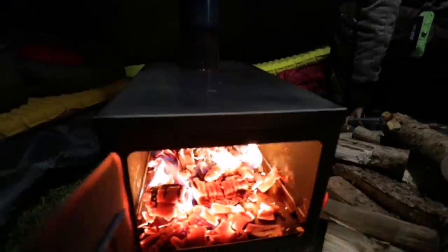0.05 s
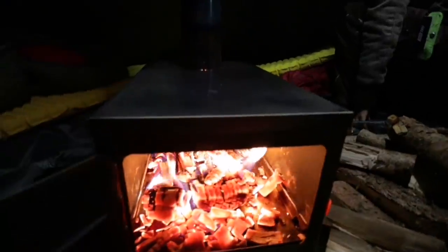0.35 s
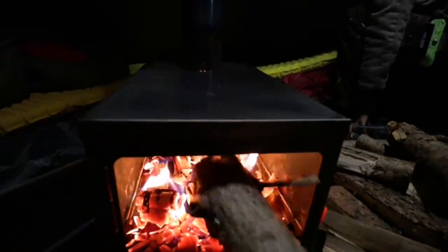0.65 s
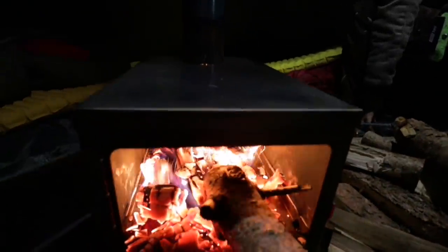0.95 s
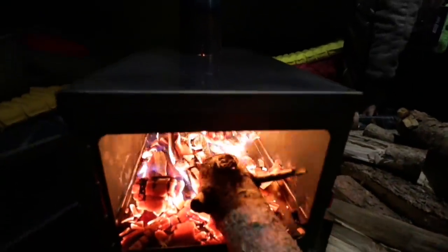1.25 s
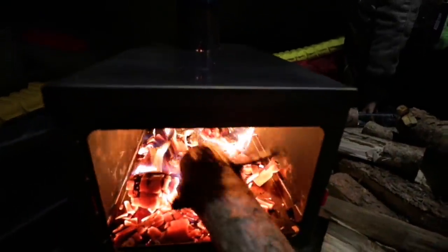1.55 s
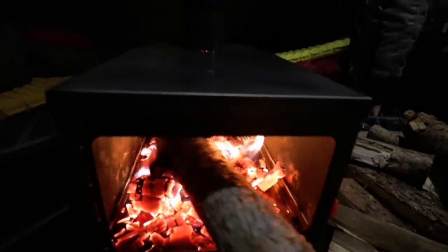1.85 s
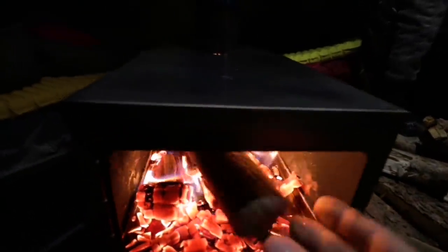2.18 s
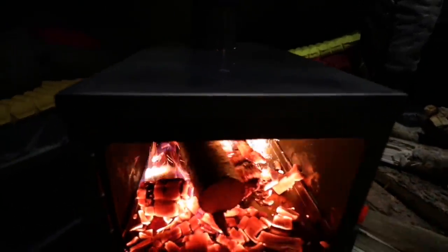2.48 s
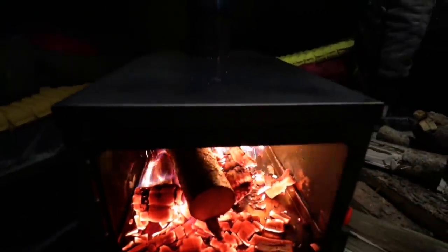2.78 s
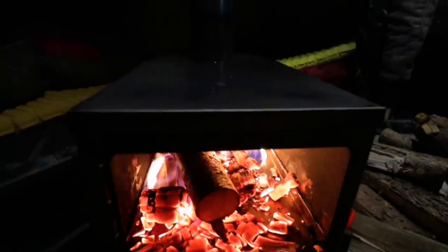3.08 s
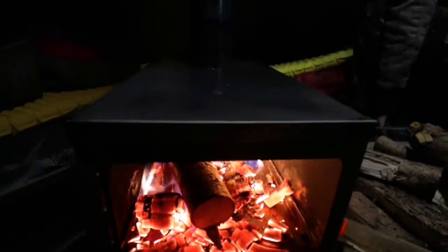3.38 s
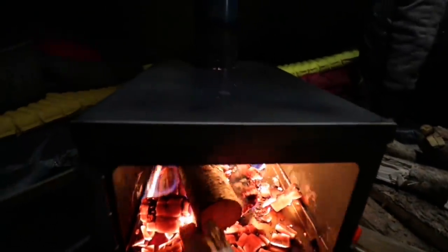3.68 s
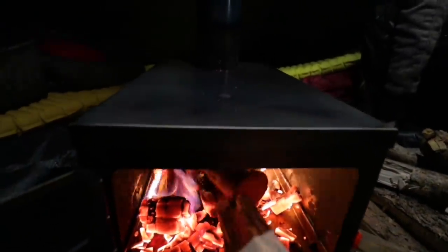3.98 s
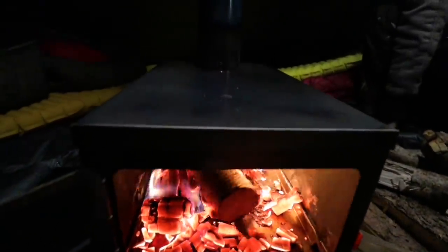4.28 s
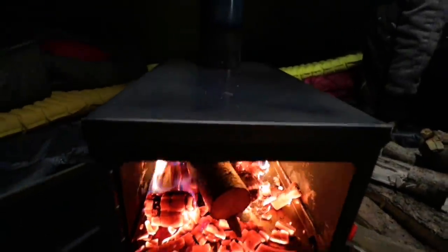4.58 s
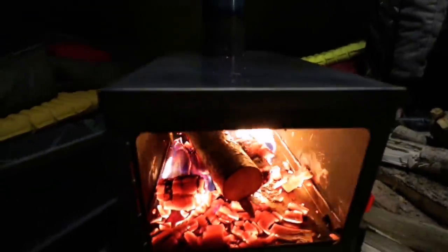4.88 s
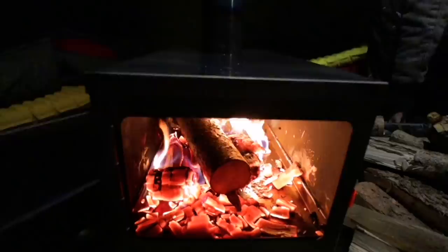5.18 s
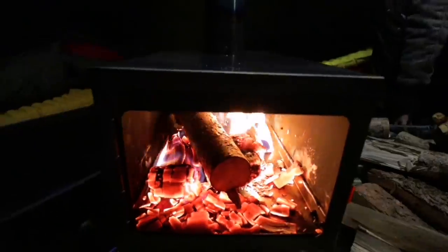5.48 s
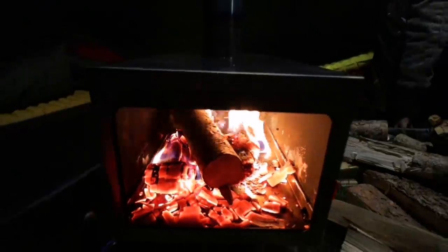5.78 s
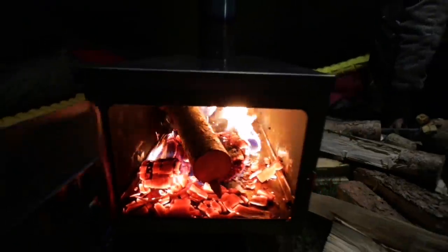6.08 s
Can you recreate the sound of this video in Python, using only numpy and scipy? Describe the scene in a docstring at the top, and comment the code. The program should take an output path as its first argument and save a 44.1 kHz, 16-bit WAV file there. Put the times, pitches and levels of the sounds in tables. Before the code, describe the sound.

One microphone sits close to the open door of a small steel stove inside a tent. Soft, low flame flutter and a faint, ticking ember hiss continue throughout. In the first half second a loose latch rattles, and the door hits its stop with a clank at 0.2 seconds, leaving a fading metallic hum, with some gritty scraping underneath. A log knocks sharply on the steel at about 1 second, followed by lighter bumps and short pushes crunching over charcoal. The heaviest hollow knocks and scrapes come between 2 and 3 seconds. A second log goes in more softly around 4 seconds, then the handling thins to a few small scrapes and taps. Dry, sharp pops come irregularly from the burning wood, with occasional soft, low puffs. The loudest pops are a pair near 4 seconds and a bright snap at about 6 seconds.

```python
"""Inside a tent, one microphone close to the open door of a small sheet-steel stove.
From the start flames flutter, embers hiss and the thin door hums; its loose latch rattles as it
swings against its stop. Two logs go in, knocking on the steel and scraping over the charcoal in
short pushes, with the heaviest knocks between two and three seconds in. Then the handling thins out.
All along, pockets of gas pop in the wood, loudest near four seconds and again near the end."""
import sys
import numpy as np
from scipy import signal
from scipy.fft import rfft, irfft, next_fast_len
from scipy.io import wavfile

SR = 44100
rng = np.random.default_rng(int(sys.argv[2]) if len(sys.argv) > 2 else 0)


def bounce(signal):
    """Save signal as a 16-bit WAV file at the path given by the first command-line argument."""
    frames = np.transpose(np.atleast_2d(signal))
    limited = np.clip(frames, -1, 1)
    pcm = np.round(limited * 32767).astype(np.int16)
    wavfile.write(sys.argv[1], SR, pcm)


N = 279594


def from_db(db):
    return 10 ** (np.asarray(db) / 20)


def rms_one(x):
    return x / np.sqrt(np.mean(x ** 2) + 1e-20)


def seconds(length):
    return np.arange(int(length * SR)) / SR


def fade(t, t60):
    """Falls by 60 dB in t60 seconds."""
    return np.exp(-np.log(1000) * t / t60)


def add(out, start_s, x):
    """Mixes x into out from start_s on."""
    at = max(round(start_s * SR), 0)
    out[at:at + len(x)] += x[:N - at]


def drift(per_s):
    """A random wander of RMS 1 that takes a new course per_s times a second."""
    knots = rng.standard_normal(int(N / SR * per_s) + 2)
    return rms_one(np.interp(np.arange(N) / SR * per_s, np.arange(len(knots)), knots))


def coloured(x, spectrum):
    """Causal (minimum-phase) filter through (Hz, dB) points."""
    size = 2 * next_fast_len(len(x))
    hz, db = np.transpose(sorted(spectrum))
    bin_hz = np.arange(size // 2 + 1) * SR / size
    curve_db = np.interp(np.log(bin_hz + 1), np.log(hz), db)
    cepstrum = irfft(np.log(from_db(curve_db)))
    cepstrum[1:size // 2] *= 2
    cepstrum[size // 2 + 1:] = 0
    return irfft(rfft(x, size) * np.exp(rfft(cepstrum)))[:len(x)]


def lowpass(x, hz):
    return signal.sosfilt(signal.butter(1, hz, fs=SR, output="sos"), x)


def resonance(x, hz, width_hz):
    """Band-pass with gain 1 at its centre."""
    return signal.lfilter(*signal.iirpeak(min(hz, .4 * SR), hz / width_hz, fs=SR), x + 1e-18)


def ringing(modes, t):
    """Struck modes (Hz, dB, t60 in seconds), each a dying sine."""
    return sum(from_db(db) * np.sin(2 * np.pi * hz * t) * fade(t, t60) for hz, db, t60 in modes)


def grains(per_s, spread_db):
    """Random clicks, many small and a few large."""
    sizes = from_db(spread_db * np.minimum(rng.exponential(1, N), 4))
    signs = rng.choice([-1, 1], N)
    return sizes * signs * (rng.random(N) < per_s / SR)


def echoing(x, t60, echo_db):
    """Dense reflections off the steel and the tent reach the microphone behind each click."""
    t = seconds(.5)
    tail = rng.standard_normal(len(t)) * fade(t, t60)
    return x + from_db(echo_db) * signal.fftconvolve(x, tail / np.linalg.norm(tail))[:N]


# The flames from just outside the door. Each row: frequency in Hz, relative level in dB.
FLAME_SPECTRUM = [(10, -3), (25, -3.5), (50, -3), (75, 1.5), (160, -0.5), (300, -3.5), (450, -15),
                  (900, -24), (2500, -64)]
def flames(level_db=-45, flutter_db=6.5):
    """The fire's low roar, fluttering quickly in level."""
    flutter = from_db(flutter_db * np.tanh(drift(per_s=35)))
    return from_db(level_db) * rms_one(coloured(rng.standard_normal(N) * flutter, FLAME_SPECTRUM))


# The hiss of the ember bed, close up. Each row: frequency in Hz, relative level in dB.
HISS_SPECTRUM = [(250, 5.5), (500, 5), (850, 10), (1300, 8), (2400, 0.5), (6000, -3.5), (8500, -2),
                 (10000, -12.5), (14000, -7), (16000, -17)]
def embers(hiss_db=-51, tick_db=-61, flicker_db=0.5):
    """The glowing bed hisses and gives off tiny dry ticks, each flake at its own pitch."""
    flicker = from_db(flicker_db * drift(per_s=40))
    hiss = rms_one(coloured(rng.standard_normal(N) * flicker, HISS_SPECTRUM))
    flakes = sum(resonance(grains(per_s=3, spread_db=2.5), hz, hz / 4) / np.sqrt(hz)
                 for hz in np.geomspace(2500, 13000, 12))
    ticks = rms_one(echoing(flakes, t60=.07, echo_db=0))
    return from_db(hiss_db) * hiss + from_db(tick_db) * ticks


# The door's modes, beside the microphone. Each row: pitch in Hz, level in dB, t60 in seconds.
DOOR_MODES = [(156, -37.5, 4.1), (391, -45, 0.39), (823, -34.5, 0.13), (1420, -47.5, 3.3),
              (2400, -48, 0.52)]
def door():
    """The thin door hums on after being opened."""
    return ringing(DOOR_MODES, np.arange(N) / SR)


def stroke(length, edge_s=0.0058, swell_db=5, release_db_per_s=130):
    """Force of one push: it bites, the pressure builds, then the bed comes to rest."""
    t = seconds(.7)
    building_db = swell_db * (np.clip(t / length, 0, 1) - 1)
    resting_db = release_db_per_s * np.maximum(t - length, 0)
    return np.minimum(t / edge_s, 1) * from_db(building_db - resting_db)


def charcoal(low_hz, high_hz, t60, count, spread_db=19):
    """Bits of charcoal knock together at random, each with its own size and pitch."""
    out, t = np.zeros(N), seconds(.06)
    for when, pitch, size in rng.random((count, 3)):
        hz = low_hz * (high_hz / low_hz) ** pitch
        add(out, when * (N - 1) / SR, ringing([(hz, spread_db * size, t60)], t))
    return rms_one(out)


# Crushed charcoal, and the stove floor under it. Each row: frequency in Hz, relative level in dB.
CRUNCH_SPECTRUM = [(200, -12), (400, -6.5), (720, -0.5), (1150, -7.5), (1500, -9.5), (2500, -8),
                   (5000, -14.5), (8500, -15.5), (10000, -22), (14000, -20.5), (16000, -40)]
RUMBLE_SPECTRUM = [(30, -23), (70, -9.5), (140, 0), (280, -2), (450, -8.5), (900, -20), (2500, -84)]
# A log pushed off the pile or over the embers, or settling. Each row: start in seconds,
# push length in seconds, level in dB, rumble lift in dB, treble lift in dB.
LOG_PUSHES = [(0.0, 0.015, -26.5, -11.5, -7), (0.239, 0.058, -22.5, -3.5, -5), (0.43, 0.024, -25, -9, -4.5),
              (1.226, 0.095, -46, 3, 5), (1.392, 0.085, -39, -4, 3.5), (1.574, 0.033, -36.5, 6, -6),
              (2.049, 0.051, -22.5, 3.5, -3), (2.412, 0.02, -18, 0.5, 7), (2.566, 0.083, -20.5, -7.5, -7.5),
              (2.719, 0.028, -27, -1.5, -6), (3.045, 0.054, -31.5, 7, 1), (3.523, 0.077, -51, 5, 18),
              (3.875, 0.052, -29.5, -4.5, 1), (3.964, .05, -33, -2.5, 2.5), (4.018, 0.095, -29.5, 4.5, -16),
              (4.311, 0.025, -48, 2, 7.5), (4.497, 0.044, -43, 4.5, 8), (5.25, 0.048, -31.5, -5, -1.5),
              (5.755, 0.01, -33, -4.5, 2.5), (5.918, 0.13, -36, -2, -9), (6.201, 0.062, -40, 1, -3.5)]
def log_slides(crunch_db=-5, rumble_db=-4, chip_db=-13, lump_db=-7):
    """Bark crushes charcoal into grit, chips and lumps while the log judders on the stove floor."""
    bumps = from_db(3 * drift(per_s=35))
    grit = bumps * grains(per_s=2500, spread_db=2.5)
    crunch = rms_one(coloured(echoing(grit, t60=0.037, echo_db=-1), CRUNCH_SPECTRUM))
    low_crunch = lowpass(crunch, 2000)
    bright = crunch - low_crunch + from_db(chip_db) * charcoal(2180, 10030, t60=.012, count=1800)
    dull = low_crunch + from_db(lump_db) * charcoal(450, 2834, t60=.018, count=1300)
    jolts = echoing(grains(per_s=860, spread_db=1), t60=0.089, echo_db=2.5)
    judder = rms_one(coloured(jolts, RUMBLE_SPECTRUM))
    press, weight, bite = np.zeros((3, N))
    for start, length, db, weight_db, treble_db in LOG_PUSHES:
        force = from_db(db) * stroke(length)
        add(press, start, force)
        add(weight, start, from_db(weight_db) * force)
        add(bite, start, from_db(treble_db) * force)
    return from_db(crunch_db) * (press * dull + bite * bright) + from_db(rumble_db) * weight * judder


# Peaks of the stove and, last, of the microphone. Each row: centre in Hz, width in Hz, gain in dB.
STOVE_AND_MIC_PEAKS = [(133, 7.7, -5.5), (224, 72, -5.5), (494, 120, -11.5), (800, 140, -8.5),
                       (1377, 134, -1), (3170, 430, -35), (8040, 820, -3)]
def stove_and_mic(x):
    """The stove's hollow resonances, plus the microphone's bright peak near 8 kHz."""
    return x + sum(from_db(db) * resonance(x, hz, width) for hz, width, db in STOVE_AND_MIC_PEAKS)


def snap(hz, echo_db, burst_s=.0008, body_db=-3, hollow_db=-12):
    """A crack about a millisecond long with a brief ring, a lower body and its echo in the stove."""
    t = seconds(.25)
    burst = rng.choice([-1, 1], len(t)) * np.exp(-(t / burst_s) ** 2)
    echo = from_db(echo_db) * rng.standard_normal(len(t)) * fade(t, t60=.11)
    width_hz = min(1.72 * hz, 15000)
    crack = resonance(resonance(burst + echo, hz, width_hz), hz, width_hz)
    tinkle = resonance(burst, hz, width_hz=250)
    body = from_db(body_db) * resonance(burst, 2180, width_hz=280)
    hollow = from_db(hollow_db) * resonance(echo, 2500, width_hz=1400)
    return crack + tinkle + body + hollow


# The latch's modes, close up. Each row: pitch in Hz, relative level in dB, t60 in seconds.
LATCH_MODES = [(2428, 14, 0.067), (2990, 4, 0.22), (3970, -3, 0.21), (6000, -10, 0.11), (7100, 3, 0.13)]
def latch(tick_db=-35.5, period_s=0.0465, stop_s=0.216, jolt_db=21.5, settle_s=0.24, ring_db=-23):
    """The loose latch ticks evenly; the door hitting its stop makes it ring and rattle harder."""
    out = np.zeros(N)
    for start in 0.0485 + period_s * np.arange(11):
        lift_db = jolt_db * np.exp((stop_s - start) / settle_s) * (start > stop_s)
        add(out, start, from_db(tick_db + lift_db) * snap(hz=6800, echo_db=-3.5))
    add(out, stop_s, from_db(ring_db) * ringing(LATCH_MODES, seconds(.5)))
    return stove_and_mic(out)


# The stove's steel walls. Each row: pitch in Hz, relative level in dB, t60 in seconds.
WALL_MODES = [(133.2, -14, 0.72), (347, -8, 1.5), (454, -10, 0.53), (830, 0, 0.65), (891, 9.5, 0.23),
              (2160, 4, 0.21)]
# Wood and steel knocking, near the microphone. Each row: start in seconds, strength in dB,
# bass lift in dB, treble tilt in dB per octave, first contact over its tail in dB,
# hollow note in Hz, clack pitch in Hz, clack lift in dB.
KNOCK_HITS = [(0.217, -11.5, -1, -1.02, 0.5, 1090, 2970, 2), (0.948, -14, 6.5, -4.5, -3, 364, 1340, 0),
              (0.9579, -7, -13, -5, 11, 730, 2050, 3.5), (1.463, -27, 5.5, -3.5, -10, 832, 1340, 1),
              (1.569, -29, 8.5, -2, -6, 173, 2780, -19), (1.71, -41, 17.5, -35, 11, 104, 1620, -23),
              (2.3427, -15.5, 12.5, -4.5, -9, 210, 1700, 11), (2.408, -7, 11, -7.5, -0.5, 129, 1410, -6),
              (2.458, -6.5, -1, -7.5, -1, 203, 1270, -14), (2.818, -6.5, 2.5, -5.5, -5, 463, 1260, -20),
              (2.9204, -4, -8, -6.5, 5, 748, 1280, -8), (3.059, -22.5, 9, -6.2, 5, 137, 2740, -10),
              (4.058, -22, 9, -3, -4.5, 126, 750, -20), (4.537, -28.5, -4, -5.5, 7, 163, 1460, -1),
              (5.976, -36, 7, -4.5, 4, 1170, 3170, 17.5)]
def knocks(blow_db=6, note_db=-4, clack_db=6, steel_db=-30, body_hz=556, rise_s=0.00082):
    """A first contact with a hollow note and a clack, a dying clatter, and the steel singing on."""
    out, t = np.zeros(N), seconds(.8)
    for start, db, bass_db, tilt, contact_db, note_hz, clack_hz, clack_lift_db in KNOCK_HITS:
        clatter = rng.standard_normal(len(t))
        dull = lowpass(clatter, 1500)
        # the cloth walls swallow the treble first
        tail = dull * fade(t, t60=0.33) + (clatter - dull) * fade(t, t60=0.27)
        contact = rng.standard_normal(len(t)) * fade(t, t60=0.045)
        # a hard contact starts with one compact push; a soft one swells as the charcoal gives way
        push = from_db(1) * np.exp(-t / 0.00008)
        swell = 1 - np.exp(-t / (rise_s * from_db(-2 * contact_db)))
        blow = from_db(contact_db) * (push + swell * contact) + swell * tail
        treble_db = tilt * np.log2(8000 / body_hz)
        spectrum = [(40, bass_db - 17), (100, bass_db), (156, bass_db), (body_hz, 0),
                    (8000, treble_db), (15000, treble_db - 3)]
        add(out, start, from_db(db + blow_db) * coloured(blow, spectrum))
        # the log's own voice, fuller in a heavy blow
        voice_db = db + note_db + 0.89 * max(bass_db, 0)
        add(out, start, ringing([(note_hz, voice_db, 0.061)], t))
        clack = resonance(resonance(contact, clack_hz, width_hz=600), clack_hz, width_hz=1200)
        add(out, start, from_db(db + clack_lift_db + clack_db) * clack)
        # harder contacts ring the steel more
        add(out, start, from_db(db + contact_db / 2 + steel_db) * ringing(WALL_MODES, t))
    # little of the knocks reaches below about 55 Hz
    low_cut = signal.butter(2, 55, "high", fs=SR, output="sos")
    return stove_and_mic(signal.sosfilt(low_cut, out + 1e-18))


# Pops in the burning wood. Each row: start in seconds, level in dB, pitch in Hz, echo in dB.
WOOD_POPS = [(0.324, -19, 3100, -2.5), (0.386, -22, 8600, -10), (1.1158, -27.5, 7760, -33),
             (1.695, -33, 8000, -25), (1.917, -27.5, 2760, -23), (1.9915, -27, 3500, -20),
             (3.34, -30.5, 5340, -17), (3.9802, -15, 3700, -15.5), (4.0809, -13.5, 3350, -13),
             (4.394, -31.5, 5470, -17), (4.422, -25, 3230, -18), (4.434, -31, 5550, -11),
             (4.9484, -26.5, 8000, -6), (5.118, -33, 4800, -9), (5.1765, -30.5, 7440, -15),
             (5.256, -34.5, 5800, -2), (5.3342, -26, 5100, -4), (5.6083, -27.5, 7800, -32),
             (5.868, -33.5, 3530, -2.5), (5.9771, -30, 3080, -2), (6.0303, -11.5, 9700, -22.5)]
def pops(gain_db=2):
    """Pockets of gas split the wood; pops deeper in the stove, further from the microphone, echo more."""
    out = np.zeros(N)
    for start, db, hz, echo_db in WOOD_POPS:
        add(out, start, from_db(db + gain_db) * snap(hz, echo_db))
    return stove_and_mic(out)


# Puffs among the flames. Each row: start in seconds, level in dB.
GAS_PUFFS = [(1.406, -16.5), (1.535, -18), (1.615, -22), (1.825, -22), (1.867, -22.5), (3.3, -22.5),
             (3.749, -24), (4.379, -20), (5.033, -20.5)]
def puffs(gain_db=1, hz=190, t60=0.012):
    """Pockets of gas catch, each with one soft, low thump."""
    out = np.zeros(N)
    for start, db in GAS_PUFFS:
        add(out, start, ringing([(hz, db + gain_db, t60)], seconds(.1)))
    return out


def squeak(start_s=2.5, length_s=.01, hz=2161, width_hz=90, level_db=-38):
    """Bark sticks and slips on the steel with a tiny, narrow squeal."""
    out = np.zeros(N)
    friction = rng.standard_normal(int(length_s * SR))
    squeal = resonance(resonance(friction, hz, width_hz), hz, width_hz)
    add(out, start_s, from_db(level_db) * rms_one(squeal))
    return out


def scene():
    """Everything that reaches the one microphone at the stove door."""
    mono = flames() + embers() + door() + log_slides() + latch() + knocks() + pops() + puffs() + squeak()
    return mono[None]


def record(dry, ceiling=1.2, cutoff_hz=15650):
    """The recorder rounds off the hardest knocks and cuts the very top."""
    rounded = ceiling * np.tanh(dry / ceiling)
    return signal.sosfilt(signal.ellip(10, .1, 70, cutoff_hz, fs=SR, output="sos"), rounded)


dry = scene()
out = record(dry)
bounce(out)
```